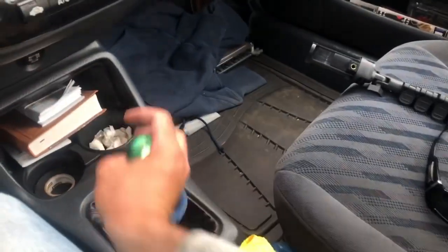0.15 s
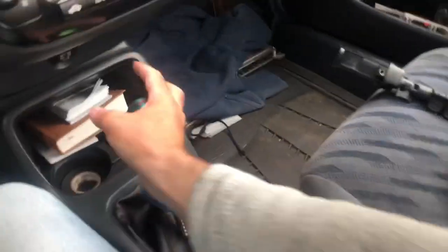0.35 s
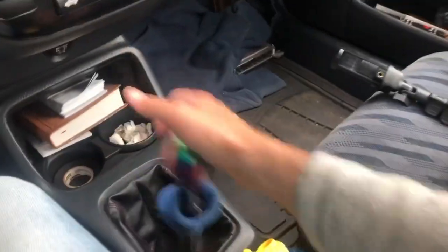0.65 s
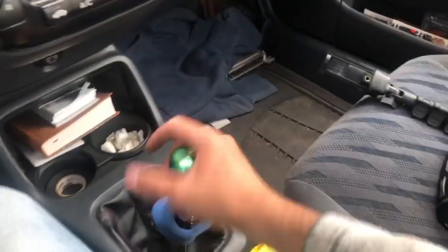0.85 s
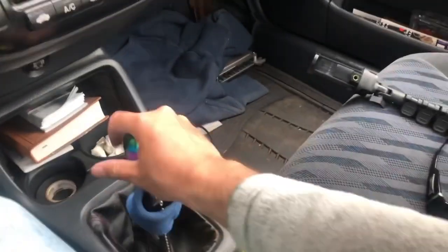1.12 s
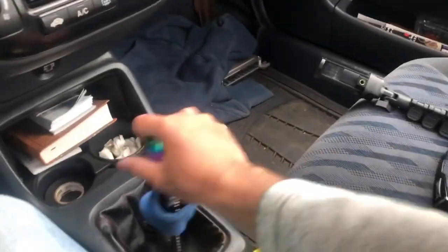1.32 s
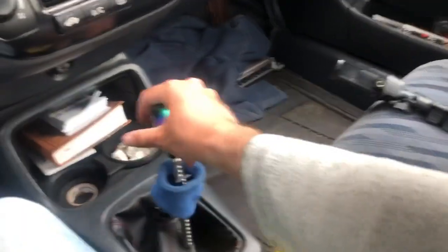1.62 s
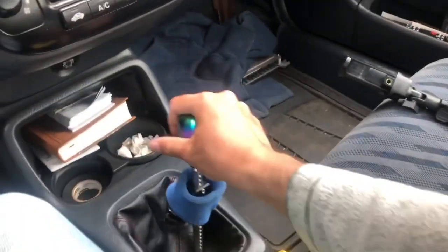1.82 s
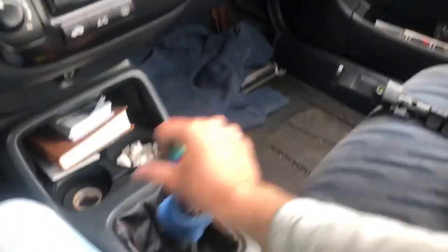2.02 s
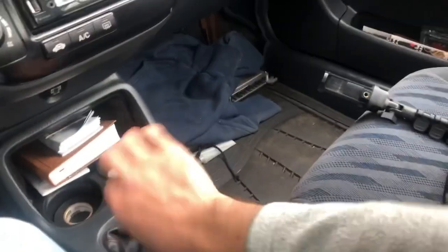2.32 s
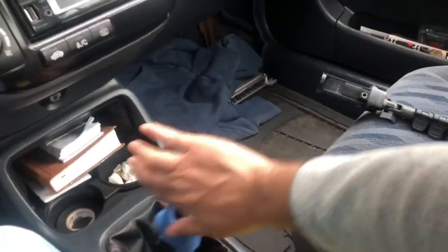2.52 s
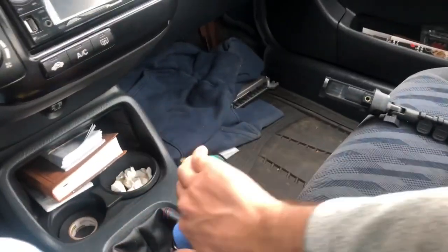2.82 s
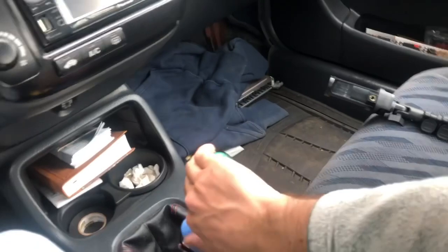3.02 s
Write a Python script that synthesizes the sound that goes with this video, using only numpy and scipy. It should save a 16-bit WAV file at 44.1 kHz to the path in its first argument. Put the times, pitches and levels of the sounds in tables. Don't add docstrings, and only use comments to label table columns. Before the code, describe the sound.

A manual gear lever clicks and knocks through its gates inside a quiet, softly rumbling car cabin.

```python
import sys
import numpy as np
from scipy import signal
from scipy.fft import rfft, irfft
from scipy.io import wavfile
from scipy.ndimage import uniform_filter1d

SR = 44100
rng = np.random.default_rng(int(sys.argv[2]) if len(sys.argv) > 2 else 0)


def linear_from_db(decibels):
    return 10 ** (np.asarray(decibels, float) / 20)


def int16_out(signal):
    q = np.round(np.clip(np.atleast_2d(signal).T, -1, 1) * 32767)
    wavfile.write(sys.argv[1], SR, q.astype(np.int16))


N = 138915
T = np.arange(N) / SR

# pitch_hz, level_db, t60_s
LEVER_MODES = [(1200, -2, 0.013), (1530, -5, 0.0086), (2190, 0, 0.007), (2870, -0.5, 0.0032),
               (3520, -7, 0.0092), (3980, -16.5, 0.0055), (5800, -24, 0.0087), (8320, -18, 0.0085)]
# pitch_hz, level_db, t60_s
CONSOLE_MODES = [(146.8, -7.5, 0.13), (204, -4.5, 0.097), (257.4, -3.5, 0.051), (303.6, -5, 0.06),
                 (366.6, -4, 0.064), (443.2, -9.5, 0.13), (512, -16, 0.078), (653, -20, 0.04),
                 (758, -20, 0.035), (871, -17.5, 0.029), (1073, -22, 0.063), (1120, -24, 0.04)]


def unit(x):
    return x / np.sqrt(np.mean(x ** 2))


def ring(push, modes):
    out = 0
    for hz, db, t60 in modes:
        pole = np.exp(2j * np.pi * hz / SR - np.log(1000) / (max(t60, 0.004) * SR))
        out = out + linear_from_db(db) * signal.lfilter([1], [1, -pole], push).imag
    return out


def add(out, start_s, x, peak_db):
    i = max(int(start_s * SR), 0)
    out[i:i + len(x)] += (linear_from_db(peak_db) * x / np.max(np.abs(x)))[:N - i]


def bell(noise, hz, octaves):
    f = np.fft.rfftfreq(len(noise), 1 / SR) + 1
    weight = np.exp(-0.5 * (np.log2(f / hz) / octaves) ** 2)
    return unit(irfft(rfft(noise) * weight, len(noise)))


def walk(rate_hz):
    k = int(SR / rate_hz)
    steps = np.repeat(rng.standard_normal(N // k + 1), k)
    return unit(uniform_filter1d(uniform_filter1d(steps, k), k)[:N])


def hump(start_s, length_s):
    return np.sin(np.pi * np.clip((T - start_s) / length_s, 0, 1))


def swell(t, length_s, skew):
    return np.sin(np.pi * np.clip(t / length_s, 0, 1) ** skew)


def cabin():
    # pitch_hz, level_db (per Hz)
    spectrum = [(15, -33), (25, 5), (48, 3.5), (68, -1), (198, -13), (281, -15), (970, -34.5),
                (1170, -34.5), (15500, -47)]
    rumble_db, swell_db, flicker_db = -47, 0.6, 1.2
    pitch_hz, level_db = np.array(spectrum).T
    out, slow = 0, walk(4.2)
    for hz in 30 * 2 ** np.arange(0, 9.5, 0.5):
        life_db = (swell_db * slow + flicker_db * walk(7.37)) * min(1, (300 / hz) ** 0.21)
        band_db = np.interp(np.log(hz), np.log(pitch_hz), level_db) + 10 * np.log10(hz)
        out = out + linear_from_db(band_db + life_db) * bell(rng.standard_normal(N), hz, 0.27)
    return unit(out) * linear_from_db(rumble_db)


def grind():
    # time_s, level_db
    drag = [(0, -65), (.3, -52), (.55, -54.5), (.72, -43), (.9, -61), (1.28, -63), (1.5, -48.5), (1.9, -66),
            (2.1, -51), (2.45, -67), (2.8, -61), (3.15, -69.5)]
    slips_per_s, spread_db, lever_db = 400, 1.5, -22
    slips = (rng.random(N) < slips_per_s / SR) * rng.standard_normal(N)
    slips = slips * linear_from_db(spread_db * walk(30.33))
    body = unit(ring(slips, CONSOLE_MODES)) + linear_from_db(lever_db) * unit(ring(slips, LEVER_MODES))
    return body * linear_from_db(np.interp(T, *np.array(drag).T))


def rubs():
    # start_s, length_s, level_db, centre_hz
    rustles = [(0, 0.062, -62.5, 6700), (0.464, 0.052, -62.5, 8950), (0.682, 0.035, -61, 11000),
               (0.895, 0.096, -63, 5330), (1.099, 0.0033, -53.5, 13000), (1.10, 0.042, -81, 3960),
               (1.173, 0.073, -70, 7000), (1.257, 0.038, -66.5, 9000), (1.367, 0.041, -67, 6000),
               (1.484, 0.061, -64, 7900), (1.538, 0.074, -68, 7900), (1.722, 0.014, -60.5, 7850),
               (1.93, 0.025, -75, 7000), (2.034, 0.041, -67.5, 8900), (2.18, 0.073, -61.5, 9000),
               (2.393, .012, -66, 10000), (2.705, 0.035, -68.5, 5000), (3.092, 0.045, -74, 14000),
               (3.136, 0.038, -56, 6960)]
    out, noise, grain = 0, rng.standard_normal(N), linear_from_db(-2 * walk(300))
    for start_s, length_s, db, hz in rustles:
        out = out + linear_from_db(db) * hump(start_s, length_s) * grain * bell(noise, hz, 1.07)
    return out


def knocks():
    # start_s, length_s, peak_db, pitch_hz
    shudders = [(0.128, 0.18, -38.5, 447), (0.223, 0.031, -30, 423), (0.238, 0.067, -31.5, 282),
                (0.297, 0.02, -26.5, 520), (0.31, 0.033, -31.5, 212), (0.412, 0.033, -48, 493),
                (0.464, 0.014, -38, 390), (0.564, 0.019, -37.5, 326), (0.637, 0.036, -24.5, 272),
                (0.675, 0.049, -28.5, 482), (0.714, 0.031, -40, 250), (0.791, 0.1, -46, 195),
                (1.004, 0.066, -46.5, 460), (1.112, 0.057, -33.5, 278), (1.338, 0.07, -42, 418),
                (1.378, 0.057, -36.5, 380), (1.500, 0.068, -39, 499), (1.548, 0.043, -34, 438),
                (1.587, 0.029, -33, 197), (1.705, 0.052, -40.5, 420), (1.928, 0.043, -36, 489),
                (2.043, 0.053, -41.5, 390), (2.115, 0.019, -43, 414), (2.22, 0.099, -49.5, 360),
                (2.291, 0.032, -38, 452), (2.474, 0.045, -37, 445), (2.544, 0.048, -37, 450),
                (2.711, 0.094, -38, 204), (2.772, 0.033, -32.5, 516), (3.071, 0.023, -43, 293)]
    t60_s, floor_hz, grit_db = 0.043, 151, -15.5
    out, t = np.zeros(N), T[:8192]
    high = signal.butter(2, floor_hz, "high", fs=SR, output="sos")
    for start_s, length_s, db, hz in shudders:
        push = rng.standard_normal(len(t)) ** 3 * swell(t, length_s, 0.57)
        body = ring(push, CONSOLE_MODES + [(hz, 4, t60_s)])
        body = body + linear_from_db(grit_db) * ring(push, LEVER_MODES)
        add(out, start_s, signal.sosfilt(high, body), db)
    return out


def clicks():
    # start_s, peak_db, pitch_hz, crack_db (treble crack, relative to the click)
    contacts = [(0.192, -48.5, 1480, -8), (0.212, -28.5, 2220, -13), (0.2921, -37, 5430, 1),
                (0.41, -64, 1590, -2.5), (0.557, -50.5, 2120, -8), (0.629, -39.5, 3430, -13),
                (.668, -39.5, 3520, -13), (0.679, -38, 2170, -7), (1.111, -50, 3600, -18),
                (1.354, -51, 1450, -30), (1.378, -58, 1200, -3), (1.389, -47, 2410, -25),
                (1.505, -56, 2660, 4), (1.550, -44, 2240, -8.5), (1.671, -61, 2500, 0),
                (1.698, -55, 2630, -3), (1.723, -54, 1600, 4), (1.812, -63, 1690, -2),
                (1.926, -46.5, 3420, -8.5), (2.037, -49, 2500, -12), (2.113, -54.5, 2100, -7),
                (2.291, -47.5, 2500, -20), (2.47, -47.5, 2500, -24), (2.547, -46, 2170, -5.5),
                (2.7, -48, 3150, -6), (2.766, -43.5, 2650, -21), (3.072, -54.5, 1490, -19)]
    rattle_rise_s, rattle_s, rattle_lead_s = 0.004, 0.0073, 0.003
    crack_rise_s, crack_s = 0.00074, 0.009
    ring_db, ring_loss, ring_t60_s = -6, 0.62, 0.026
    detune, scatter_db, hard_hz = 0.023, 6, 4000
    out, t = np.zeros(N), T[:4096]
    for start_s, db, hz, crack_db in contacts:
        rattle_noise, crack_noise, chance = rng.standard_normal((3, len(t)))
        rattle = rattle_noise * (1 - np.exp(-t / rattle_rise_s)) ** 2 * np.exp(-(t / rattle_s) ** 2)
        modes = [(hz, ring_db - ring_loss * crack_db, ring_t60_s)]
        for k, (mode_hz, mode_db, t60_s) in enumerate(LEVER_MODES):
            mode_db = mode_db + scatter_db * chance[-1 - k]
            if mode_hz > hard_hz:
                mode_db = mode_db + 0.8 * crack_db + 15
            modes.append((mode_hz * (1 + detune * chance[k]), mode_db, t60_s))
        lead_s = rattle_lead_s * (crack_db < -3)
        add(out, start_s - lead_s, ring(rattle, modes), db)
        crack = bell(crack_noise, 3180, 0.66) * (1 - np.exp(-t / crack_rise_s)) * np.exp(-t / crack_s)
        add(out, start_s, crack, db + crack_db)
    return out


def ticks():
    # start_s, peak_db, pitch_hz
    taps = [(.214, -36, 2110), (0.221, -27.5, 464), (0.232, -22, 293), (0.414, -56, 920), (.557, -50, 1320),
            (.613, -54.5, 6200), (0.6247, -48, 1530), (.6293, -42.5, 2210), (.630, -51, 3460),
            (.649, -45, 686), (.669, -47, 3600), (.680, -45, 3520), (.689, -25, 330), (.668, -56, 6800),
            (0.68, -48.5, 6970), (1.38, -59, 1080), (1.507, -52, 650), (1.562, -32, 417), (1.572, -32, 400),
            (1.928, -51, 3450), (2.291, -54, 2720), (2.296, -45.5, 2190), (2.300, -35, 360),
            (2.469, -53, 2880), (2.474, -47.5, 2260), (2.479, -33, 330), (2.55, -52, 1590),
            (2.552, -49, 3380), (2.557, -52, 1270), (2.561, -33, 457), (2.716, -54, 1080),
            (2.758, -49, 1500), (2.766, -41.5, 2640), (2.770, -43.5, 620), (2.792, -41.5, 494)]
    tap_s, ring_cycles, longest_t60_s = 0.0013, 50, 0.029
    out, t = np.zeros(N), T[:2048]
    for start_s, db, hz in taps:
        tap = swell(t, tap_s, 0.98) * np.sin(2 * np.pi * hz * t)
        add(out, start_s, ring(tap, [(hz, 0, min(ring_cycles / hz, longest_t60_s))]), db)
    return out


def scrapes():
    # start_s, length_s, level_db, centre_hz
    slips = [(0.224, 0.1, -53.5, 1070), (.25, 0.059, -42, 474), (0.31, .05, -66, 1200),
             (0.415, 0.049, -67, 1390), (0.64, 0.026, -61, 2210), (0.664, 0.059, -53, 980),
             (0.67, .04, -63, 2540), (0.91, 0.13, -69.5, 1100), (1.093, 0.054, -58, 1180),
             (1.097, 0.04, -60, 3450), (1.324, 0.12, -55, 434), (2.035, 0.14, -62, 420),
             (1.099, 0.055, -54, 640), (2.272, 0.016, -63, 1490), (2.297, 0.043, -58.5, 560),
             (2.483, 0.082, -71, 1610), (2.535, 0.04, -48.5, 415), (2.695, 0.028, -61, 1320),
             (2.766, 0.042, -54.5, 876), (2.772, 0.048, -73, 3740), (2.584, .02, -70.5, 4950),
             (0.812, 0.063, -72, 10000)]
    out, noise, grain = np.zeros(N), rng.standard_normal(N), linear_from_db(1.5 * walk(250))
    for start_s, length_s, db, hz in slips:
        out += linear_from_db(db) * hump(start_s, length_s) * grain * bell(noise, hz, 0.42)
    return out


def booms():
    # start_s, length_s, peak_db, pitch_hz
    blows = [(0.229, 0.061, -25, 56), (0.291, 0.097, -30, 60.2), (0.348, 0.032, -27.5, 56.4),
             (0.423, 0.09, -35, 65.4), (0.637, 0.043, -30, 74.7), (0.686, 0.046, -26.5, 61),
             (0.761, 0.1, -33, 52.2), (1.105, 0.038, -34, 65.6), (1.469, 0.13, -39, 56.5),
             (1.578, 0.051, -32.5, 61.4), (1.633, 0.023, -29.5, 58), (1.731, 0.06, -34.5, 58),
             (1.947, 0.036, -42, 47), (2.064, 0.038, -37, 115), (2.117, 0.039, -35.5, 58),
             (2.169, 0.034, -45, 50), (2.326, .05, -40, 48), (2.7, 0.11, -39.5, 55.4),
             (2.784, 0.031, -26.5, 56.3), (2.829, 0.023, -27, 66), (2.865, 0.044, -41.5, 45),
             (3.067, 0.042, -50, 69)]
    pair_ratio, pair_db, skew = 1.606, -9.5, 0.59
    out, t = np.zeros(N), T[:8192]
    for start_s, length_s, db, hz in blows:
        pair = np.sin(2 * np.pi * hz * t) + linear_from_db(pair_db) * np.sin(2 * np.pi * hz * pair_ratio * t)
        add(out, start_s, pair * swell(t, length_s * 1.27, skew), db)
    return out


def squeak():
    # centre_hz, width_hz, level_db
    bands = [(1900, 920, -61.5), (3980, 490, -67), (3150, 2700, -68), (6000, 4300, -71)]
    start_s, length_s = 1.134, 0.12
    out, noise, stutter = 0, rng.standard_normal(N), linear_from_db(1.4 * walk(58.1))
    for hz, width_hz, db in bands:
        out = out + linear_from_db(db) * hump(start_s, length_s) * stutter * bell(noise, hz, width_hz / hz / 2)
    return out


def scene():
    tail_t60_s, tail_db = 0.18, -9
    rumble = cabin()
    near = grind() + rubs() + knocks() + clicks() + ticks() + scrapes() + squeak()
    tail = rng.standard_normal(8192) * linear_from_db(-60 * T[:8192] / tail_t60_s)
    wet = signal.fftconvolve(near, tail / np.sqrt(np.sum(tail ** 2)))[:N]
    return (near + linear_from_db(tail_db) * wet + booms() + rumble)[None]


def top_cut(x):
    return signal.sosfilt(signal.butter(12, 15900, fs=SR, output="sos"), x)


def record(dry):
    top = signal.ellip(10, 0.2, 60, 15850, fs=SR, output="sos")
    low = signal.butter(4, 34, "high", fs=SR, output="sos")
    mix = signal.sosfilt(np.vstack([low, top]), dry)
    return top_cut(mix)


dry = scene()
out = record(dry)
int16_out(out)
```